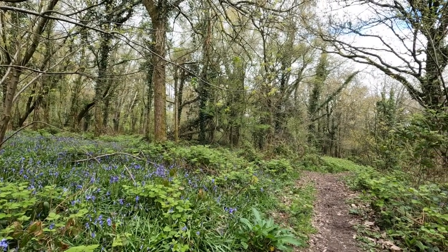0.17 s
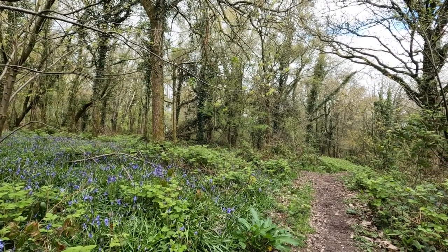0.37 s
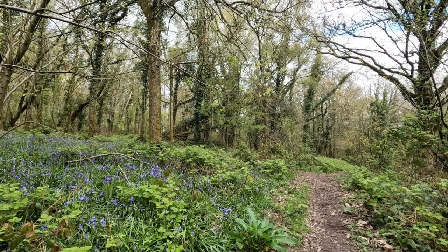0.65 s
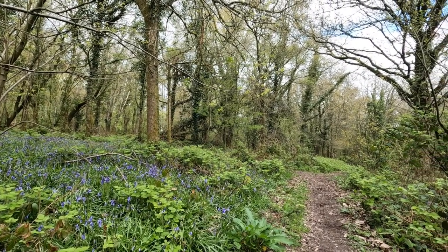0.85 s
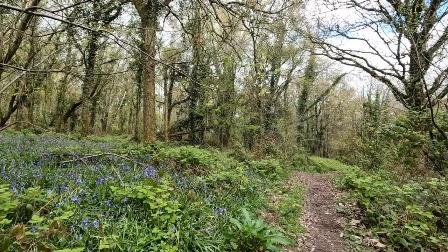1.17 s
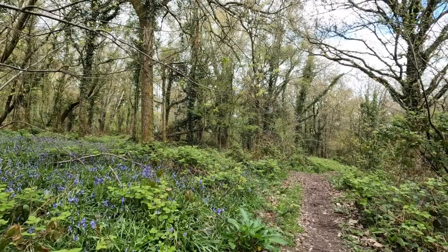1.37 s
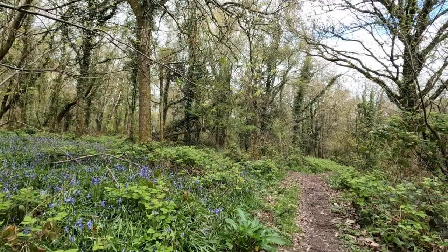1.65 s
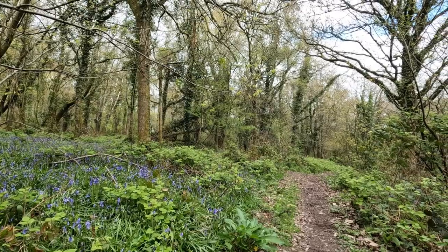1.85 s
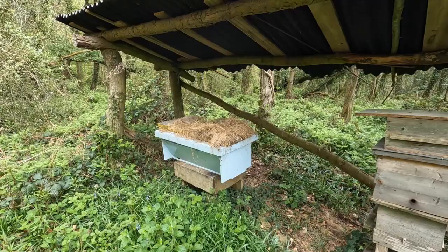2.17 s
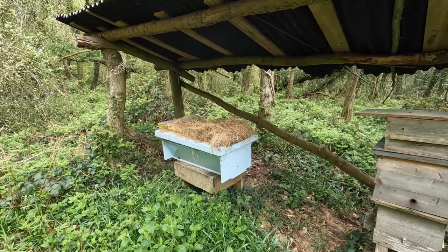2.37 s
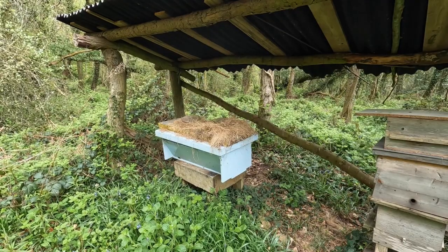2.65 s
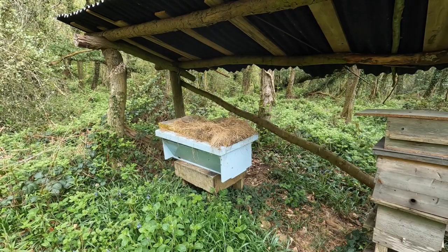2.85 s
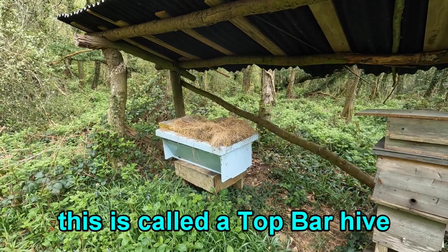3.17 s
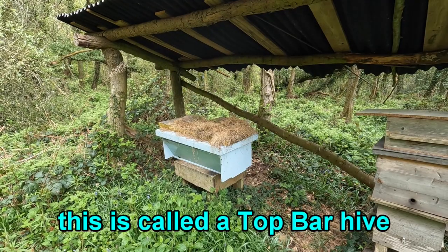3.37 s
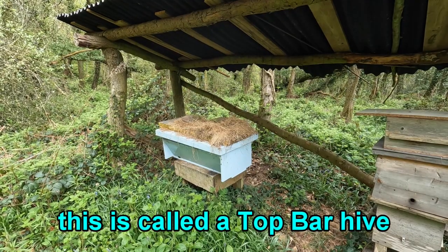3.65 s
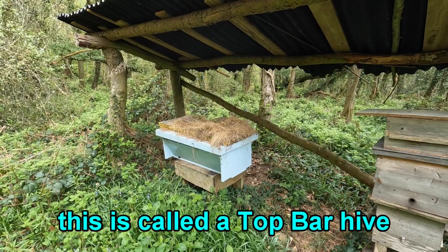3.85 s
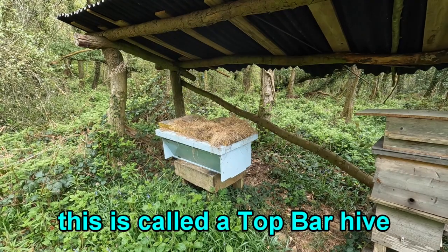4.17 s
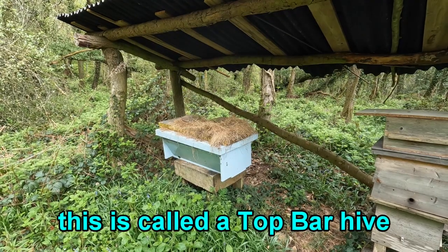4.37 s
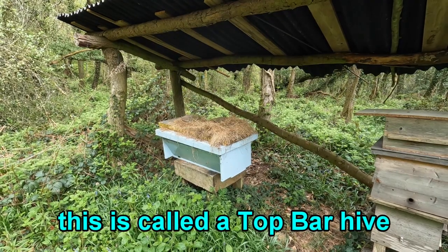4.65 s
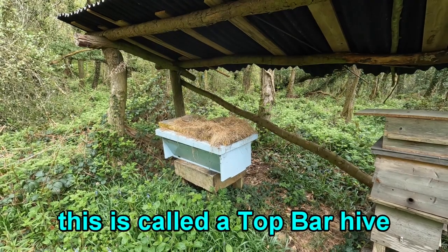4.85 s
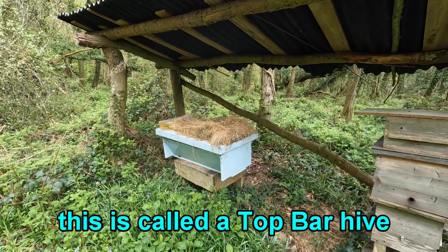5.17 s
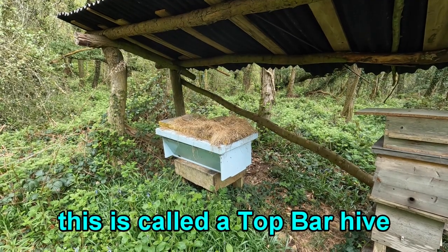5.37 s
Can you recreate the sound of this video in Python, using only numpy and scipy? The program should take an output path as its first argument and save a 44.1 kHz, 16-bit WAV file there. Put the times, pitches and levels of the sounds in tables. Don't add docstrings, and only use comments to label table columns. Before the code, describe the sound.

Lively close birdsong, sharp chirps and fast trills over unsteady low wind rumble, fills the first two seconds. It ends abruptly on a wind buffet. After a short gap, a very quiet, almost mono woodland opens beside a hive; blurred far birds grow denser, a distant engine pulses low, bees hum faintly, and murmur and hiss rise and widen towards the end.

```python
import sys
import numpy as np
from scipy import signal
from scipy.fft import rfft, irfft
from scipy.io import wavfile
from scipy.ndimage import uniform_filter1d

SR = 44100
rng = np.random.default_rng(int(sys.argv[2]) if len(sys.argv) > 2 else 0)


def master_out(mix):
    frames = np.transpose(np.atleast_2d(mix))
    ceiling = np.clip(frames, -1, 1)
    pcm = np.round(ceiling * 32767).astype(np.int16)
    wavfile.write(sys.argv[1], SR, pcm)


def field_ratio(decibels):
    return 10 ** (np.asarray(decibels, dtype=float) / 20)


N = 243431
TIME = np.arange(N) / SR

COO_WARBLE, BURR_WARBLE, RASP_WARBLE = 28, 245, 520


def curve(rows):
    rows = np.array(rows)
    return np.interp(TIME, rows[:, 0], rows[:, 1])


def walk(rate_hz):
    hold = int(SR / rate_hz)
    steps = np.repeat(rng.standard_normal(N // hold + 1), hold)
    slewed = uniform_filter1d(uniform_filter1d(steps, hold), hold)
    return 1.3 * slewed[:N]


def panned(wave, pan_db):
    sides = field_ratio(np.array([[pan_db], [-pan_db]]) / 2)
    return wave * sides / np.sqrt(np.mean(sides ** 2))


def add(track, start, wave):
    a, b = max(start, 0), min(start + wave.shape[-1], N)
    track[..., a:b] += wave[..., a - start:b - start]


def bands(spectrum, level_db, flicker_db, alike_hz):
    hz = np.maximum(np.arange(N // 2 + 1) * SR / N, 1)
    points = np.array(spectrum)
    colour = field_ratio(np.interp(np.log(hz), np.log(points[:, 0]), points[:, 1]))
    mid, side = rfft(rng.standard_normal((2, N))) * colour
    apart = 1 / np.sqrt(1 + alike_hz / hz)
    pair = np.array([mid + apart * side, mid - apart * side]) / np.sqrt(1 + apart ** 2)
    out = np.zeros((2, N))
    for octave in range(4, 15):
        distance = np.clip(np.log2(hz) - octave, -1, 1)
        share = np.cos(np.pi / 2 * distance) ** 2
        out += irfft(pair * share, N) * field_ratio(flicker_db * walk(8.2))
    return out * field_ratio(level_db) / out.std()


def whistle(s, hz, db, edge_s, waver_hz):
    i = np.arange(int((s[0] - edge_s) * SR), int((s[-1] + edge_s) * SR))
    t = i / SR
    from_end_s = np.minimum(t - t[0], t[-1] - t)
    edge = np.sin(np.pi / 2 * np.clip(from_end_s / (2 * edge_s), 0, 1)) ** 2
    pitch = uniform_filter1d(np.interp(t, s, hz), size=110) + waver_hz[i % N]
    level = np.sqrt(2) * field_ratio(np.interp(t, s, db)) * edge
    return i[0], level * np.sin(2 * np.pi * np.cumsum(pitch) / SR)


def trees(x, t60_s, rise_s, alike):
    t = np.arange(SR) / SR
    both, own = rng.standard_normal((2, 2, SR))
    noise = alike * both[0] + np.sqrt(1 - min(alike, 1) ** 2) * own
    bass = signal.sosfilt(signal.butter(2, 6500, fs=SR, output="sos"), noise)
    decay = field_ratio(-60 * t / t60_s)
    echoes = (bass + (noise - bass) * decay) * (1 - np.exp(-t / rise_s)) * decay
    echoes /= np.sqrt(np.sum(echoes ** 2, axis=1, keepdims=True))
    return signal.fftconvolve(x, echoes, axes=1)[:, :N] * field_ratio(1.5 * walk(300))


def motif_notes():
    # t after start/s, f/Hz, level under peak/dB
    seep = [(0, 7470, -23.5), (.007, 8950, -5), (.015, 8750, 1), (.026, 8000, -0.5), (.054, 8400, 2),
            (.057, 8600, -11), (.061, 9360, -10)]
    short_seep = [(0, 8970, -1.5), (.017, 8030, 1.5), (.04, 8300, -4.5)]
    swoop = [(0, 3182, -17), (.008, 3495, 1.5), (.021, 3730, -3.5), (.044, 3800, -7.5), (.064, 3890, -16.5)]
    arch = [(0, 3270, -14), (.007, 3990, -3.5), (.014, 4277, -4), (.022, 4300, -3), (.031, 4130, -4),
            (.038, 3445, -1.5), (.048, 2396, -29.5)]
    low_hook = [(0, 4094, -11), (.014, 3125, 0), (.021, 3045, -4), (.026, 3050, -8), (.035, 2975, -9)]
    high_hook = [(0, 3395, -15), (.01, 4126, -15.5), (.024, 3680, -1.5), (.04, 3316, -10)]
    late_hook = [(0, 3495, -9), (.011, 3985, -7), (.024, 3620, -2), (.038, 3360, -8)]
    dip = [(0, 2686, -7.5), (.012, 2510, -6), (.03, 2450, -2), (.055, 2470, -6.5)]
    climb = [(0, 3875, -7.5), (.012, 4230, -2.5), (.026, 4230, -3.5)]
    bow = [(0, 7100, -4.5), (.03, 7730, -1), (.05, 7740, -4.5)]
    rise = [(0, 2766, -17.5), (.012, 3147, -7), (.0205, 3436, -1), (.025, 3210, -8.5), (.03, 3020, -1)]
    pip = [(0, 3464, -6), (.0045, 3494, 0.5), (.021, 3450, -18.5)]
    drop_figure = [(0, 6520, -25), (.007, 5085, -7), (.015, 4850, -1.5), (.022, 4170, -19.5)]
    flick = [(0, 5020, -1.5), (.013, 6130, -4), (.02, 4860, -14)]
    # t/s, first f/Hz, peak level/dB, left minus right/dB
    seeps = [(.118, 7510, -60.5, 7.5), (0.474, 7480, -61.5, 9)]
    short_seeps = [(0.821, 9000, -67, 4.5), (1.116, 9040, -74.5, 1), (1.388, 9070, -69.5, 3.5),
                   (1.917, 9060, -69, 5.5)]
    swoops = [(.214, 3202, -31, 14.6)]
    arches = [(.672, 3272, -33.5, 12)]
    low_hooks = [(1.094, 4126, -39, 9.7), (1.207, 4037, -37, 14)]
    high_hooks = [(1.117, 3486, -34, 15)]
    late_hooks = [(1.234, 3456, -31.5, 17)]
    dips = [(.495, 2722, -50, -6)]
    climbs = [(.624, 3894, -46.5, -5)]
    bows = [(.23, 7000, -66, 7)]
    rises = [(1.362, 2788, -34.5, 14), (1.482, 2746, -31.5, 19)]
    pips = [(1.405, 3443, -26.5, 18), (1.52, 3470, -29, 15)]
    drops = [(1.946, 6510, -37.5, 7)]
    flicks = [(0.323, 4984, -42.5, 5.5)]
    notes = []
    for motif, rows in [(seep, seeps), (short_seep, short_seeps), (swoop, swoops), (arch, arches),
                        (low_hook, low_hooks), (high_hook, high_hooks), (late_hook, late_hooks),
                        (dip, dips), (climb, climbs), (bow, bows), (rise, rises), (pip, pips),
                        (drop_figure, drops), (flick, flicks)]:
        after, shape_hz, shape_db = np.transpose(motif)
        hidden = motif is short_seep
        for s, hz, db, pan_db in rows:
            notes.append((s + after, shape_hz * hz / shape_hz[0], db + shape_db, pan_db, hidden))
    return notes


def glide_notes():
    # t/s, length/s, first f/Hz, last f/Hz, peak level/dB
    right_glides = [(0, .011, 6420, 6380, -64), (.021, 0.012, 6300, 6000, -59),
                    (.062, .064, 5950, 5520, -59), (.149, 0.011, 5550, 5400, -59),
                    (.156, .014, 5050, 4400, -58.5), (.05, 0.012, 7200, 6950, -61.5),
                    (.25, 0.01, 5440, 5000, -63), (.19, 0.034, 4740, 4930, -63.5),
                    (.218, 0.036, 5907, 5500, -58.5), (.545, 0.049, 3220, 3475, -49),
                    (.6, 0.024, 3780, 3960, -46), (.782, 0.067, 3340, 3564, -47.5),
                    (.88, .028, 2674, 2390, -54), (1.432, 0.074, 2550, 2690, -52.5),
                    (1.432, 0.034, 6280, 6000, -64.5), (1.46, 0.068, 6000, 6880, -65),
                    (1.65, 0.053, 6320, 7200, -67.5), (1.725, 0.076, 5980, 5690, -64),
                    (1.795, 0.018, 5760, 5280, -63), (1.895, 0.042, 5770, 5460, -61),
                    (1.93, .012, 5500, 4980, -60.5)]
    left_glides = [(.126, 0.015, 3950, 3244, -42.5), (.032, 0.013, 3600, 4170, -49.5),
                   (.03, 0.011, 4700, 6000, -59), (.648, 0.026, 4750, 5220, -47),
                   (.745, 0.0066, 2350, 2780, -46), (.752, .01, 2620, 2800, -40),
                   (.76, .006, 2810, 3150, -48), (.868, .027, 7310, 7370, -64),
                   (1.069, .008, 2560, 2350, -57), (1.082, .007, 2520, 2650, -55),
                   (1.858, 0.111, 1816, 1902, -66)]
    chips = [(.045, 0.016, 6000, 3420, -46), (.057, 0.0085, 7030, 5900, -52.5),
             (1.201, 0.0093, 3084, 4120, -52), (.712, 0.013, 6300, 3910, -50),
             (.848, .004, 7200, 4500, -54), (.858, .01, 5380, 4930, -61), (1.361, .012, 6170, 4500, -58),
             (1.088, 0.011, 2600, 4040, -47.5), (1.319, .003, 7080, 4700, -57),
             (1.597, 0.011, 3400, 6500, -50.5), (1.605, 0.0065, 3410, 8000, -36),
             (1.62, .006, 7800, 3400, -37)]
    # left minus right/dB, peak place/share of length, start and end under peak/dB
    right_manner = (-4.5, 0.7, -2, -1.5)
    left_manner = (8.5, 1.2, 0, -2.5)
    chip_manner = (6.5, .5, -14, -26)
    notes = []
    for rows, manner in [(right_glides, right_manner), (left_glides, left_manner), (chips, chip_manner)]:
        pan_db, peak, start_db, end_db = manner
        share = np.array([0, np.clip(peak, .05, .95), 1])
        swell_db = np.array([start_db, 0, end_db])
        for s, length, first_hz, last_hz, db in rows:
            pitches = first_hz + share * (last_hz - first_hz)
            notes.append((s + share * length, pitches, db + swell_db, pan_db, True))
    return notes


def add_trills(track, waver_hz):
    # t/s, length/s, f/Hz, level/dB, swing rate/Hz
    trill_calls = [
        (.139, 0.0834, 3464, -35.5, 68.1),
        (1.968, 0.016, 3623, -35, 176),
        (2.028, 0.047, 2630, -42, 129.4),
    ]
    for s, length, hz, db, rate_hz in trill_calls:
        swing_hz = -0.059 * hz * np.cos(2 * np.pi * rate_hz * (TIME - s))
        times = [s, s + 0.52 * length, s + length]
        start, wave = whistle(times, [hz * 1.05, hz, hz], [db - 8, db, db], 0.002298,
                              swing_hz + 3 * waver_hz)
        add(track, start, panned(wave, 16.5))


def near_birds():
    direct, covered = np.zeros((2, 2, N))
    waver_hz = 20 * walk(200)
    for s, hz, db, pan_db, hidden in motif_notes() + glide_notes():
        start, wave = whistle(s, hz, db, .003, waver_hz)
        add(covered if hidden else direct, start, panned(wave, pan_db))
    add_trills(direct, waver_hz)
    direct *= field_ratio(1.5 * walk(200))
    spread = .8 * (direct + covered) + .2 * (direct + covered)[::-1]
    direct += field_ratio(-5 + 4.5 * walk(90)) * covered
    early = field_ratio(-12) * trees(spread, .16, 0.0012, 1.0)
    late = field_ratio(-10) * trees(spread, 0.53, 0.013, 0.86)
    return direct + early + late


def wind():
    # f/Hz, level per Hz/dB
    air_spectrum = [(20, -6.5), (42, -7), (75, -9), (118, -24), (256, -24.5), (470, -43), (850, -52.5),
                    (1150, -47), (2000, -54), (3500, -42.5), (4700, -58.5), (7000, -53.5), (9500, -66),
                    (15500, -96)]
    # t/s, rumble level/dB
    gust_levels = [(0, -61), (.09, -42), (.3, -49.5), (.38, -40.5), (.5, -53), (.6, -44), (.9, -53.5),
                   (1.28, -45), (1.7, -50), (1.92, -47), (2.05, -50.5)]
    # t/s, peak/full scale, width/s, left minus right/dB
    membrane_thumps = [
        (1.238, 0.0074, 0.0073, 7.5),
        (1.964, 0.034, 0.0076, 6),
        (1.99, -0.022, 0.0072, -13.5),
        (2.029, 0.077, 0.0059, 8.5),
        (2.047, -0.036, 0.0082, -3.5),
    ]
    air = panned(bands(air_spectrum, -46, 0.95, 1500), -0.82)
    rumble = signal.sosfilt(signal.butter(2, 110, fs=SR, output="sos"), air)
    gust = field_ratio(curve(gust_levels) + 50.0)
    air = air + (gust - 1) * rumble
    for s, peak, width_s, pan_db in membrane_thumps:
        push = peak * np.exp(-.5 * ((TIME - s) / width_s) ** 2)
        air += push * field_ratio(np.array([[pan_db], [-pan_db]]) / 2)
    return air


def distant_birds(voices):
    direct = np.zeros((1, N))
    warble_rate_hz = 130 * field_ratio(4.0 * walk(40))
    waver = field_ratio(4.3 * walk(150)) * np.sin(2 * np.pi * np.cumsum(warble_rate_hz) / SR)
    for notes, width_hz in voices:
        for s, length, first_hz, last_hz, db in notes:
            start, wave = whistle([s, s + length], [first_hz, last_hz], [db, db - 0.5], .008,
                                  (15 + width_hz) * waver)
            add(direct, start, wave)
    direct *= field_ratio(2.6 * walk(90))
    nearer = field_ratio(-4.5) * trees(direct, 0.46, 0.011, 0.55)
    deeper = field_ratio(-5.0) * trees(direct, 0.93, 0.0091, 0.99)
    return field_ratio(-1.0) * direct + nearer + deeper


def deep_birds():
    # t/s, length/s, first f/Hz, last f/Hz, level/dB
    coos = [(.15, 0.24, 1558, 1730, -77), (.25, 0.072, 1160, 1175, -73.5), (.477, .011, 1520, 1860, -64.5),
            (.49, .026, 1780, 1600, -68)]
    burrs = [(.2, .072, 2900, 2896, -60), (.556, .014, 2480, 2150, -55.5), (.572, .022, 2160, 2450, -57.5),
             (.83, 0.054, 8800, 8200, -77), (1.12, 0.056, 8850, 8100, -76.5),
             (1.395, .05, 8840, 8300, -73.5), (1.925, 0.044, 8820, 8270, -73.5),
             (.485, .04, 3510, 3060, -60), (1.425, 0.044, 4850, 4580, -64), (.965, .02, 4400, 4350, -69),
             (1.05, .025, 4650, 4700, -73), (1.48, 0.027, 4900, 5100, -63.5)]
    rasps = [(0, 0.051, 2277, 2278, -63), (.04, .05, 5460, 4630, -56.5), (1.365, .046, 5640, 4600, -59.5),
             (1.6, 0.027, 5430, 5360, -58), (.852, .03, 5600, 5000, -70), (1.47, 0.057, 6200, 6820, -68.5),
             (1.64, 0.058, 6300, 7000, -69)]
    voices = [(coos, COO_WARBLE), (burrs, BURR_WARBLE), (rasps, RASP_WARBLE)]
    return panned(distant_birds(voices), 1.2)


def camera_ticks():
    # f/Hz, level per Hz/dB
    hiss_spectrum = [(9500, -36.5), (10800, -11), (11700, -9), (12600, -11.5), (13200, -19), (14900, -25.5),
                     (15200, -41.5)]
    frame_hz = 59.94
    since = (TIME - .9364) * frame_hz % 1 / frame_hz
    pair = sum(np.exp(-.5 * ((since - lag_s - .001) / .0007) ** 2) for lag_s in (0, .0052))
    depth = 1.6 * field_ratio(2.5 * walk(5))
    return panned(bands(hiss_spectrum, -90, 3.5, 3000) * (1 + depth * pair), 3.4)


def far_birds():
    # t/s, length/s, first f/Hz, last f/Hz, level/dB
    pure = [(2, 0.11, 3180, 3080, -78.5), (2.53, 0.1, 2400, 3590, -89.5), (2.79, 0.081, 4810, 4800, -85.5),
            (3.07, .045, 3680, 3850, -70), (2.9, 0.043, 3790, 3830, -77), (3.262, 0.05, 3740, 3800, -77),
            (3.808, 0.034, 4200, 4380, -73.5), (3.905, 0.019, 3400, 2800, -61.5),
            (3.924, .028, 2840, 2770, -66.5), (3.88, .016, 2800, 3400, -66), (4.005, .035, 4900, 5200, -74),
            (4.045, 0.033, 5100, 5330, -65.5), (3.079, .038, 6080, 6090, -84),
            (5.3, 0.044, 4140, 3870, -67), (5.033, 0.047, 4830, 4680, -61),
            (4.085, 0.023, 2260, 2400, -63.5), (4.443, 0.075, 7400, 7540, -82), (4.5, .05, 7730, 7840, -87),
            (4.838, 0.044, 5900, 5400, -63), (5.479, 0.045, 3166, 3100, -62),
            (5.238, 0.031, 5080, 5030, -69.5), (5.27, 0.036, 6900, 6880, -64),
            (5.368, 0.032, 5250, 5280, -68), (5.28, .02, 7650, 7700, -72), (5.13, 0.036, 5700, 5620, -67.5),
            (2.6, .06, 3150, 3080, -81), (3.15, .04, 3350, 2950, -79.5), (3.535, .04, 3100, 3180, -84)]
    wavering = [(2.398, 0.052, 4890, 4680, -76.5), (2.815, 0.063, 3794, 4000, -73.5),
                (3.049, .04, 4770, 4820, -80.5), (3.115, .03, 4760, 4820, -89),
                (3.125, .1, 6140, 6350, -90), (3.61, 0.25, 2173, 2205, -86.5),
                (3.68, 0.23, 7490, 7150, -93), (3.9, 0.034, 6300, 5750, -75),
                (3.93, 0.078, 4880, 4150, -76.5), (3.955, .03, 2820, 3230, -74),
                (4.078, 0.029, 5330, 5250, -69), (4.61, 0.071, 2820, 2590, -72.5),
                (4.817, .02, 6200, 5600, -66), (4.882, .014, 5350, 5150, -59), (4.93, .02, 5560, 5500, -68),
                (4.98, .055, 5500, 5450, -71), (4.968, 0.025, 3950, 4130, -61.5),
                (5.04, 0.015, 4080, 3980, -63), (5.108, 0.034, 5500, 6200, -68),
                (5.5, 0.025, 2780, 2550, -63), (5.07, 0.011, 2930, 2900, -51.5),
                (5.085, .06, 2885, 2760, -58)]
    burry = [(2.319, 0.059, 2935, 2850, -83.5), (2.622, 0.13, 4430, 4120, -78.5),
             (3.149, 0.076, 3200, 3054, -78), (3.25, .065, 4040, 4770, -79), (3.64, 0.13, 4380, 4300, -79),
             (4.9, 0.034, 5180, 4900, -67), (5.055, .03, 4200, 3740, -68), (5.24, 0.035, 7360, 6870, -70),
             (2.28, 0.056, 3900, 3590, -78.5), (5.379, 0.074, 7310, 7050, -68.5),
             (5.451, 0.059, 4720, 4130, -66)]
    raspy = [(2.385, .037, 5920, 4740, -80), (2.894, .11, 3240, 3070, -81),
             (4.224, 0.054, 3520, 4470, -75.5), (4.31, 0.14, 5810, 5780, -71),
             (4.48, 0.057, 4330, 5200, -76), (4.71, .13, 4720, 4580, -69.5),
             (4.93, 0.079, 4840, 3550, -65.5)]
    return distant_birds([(pure, 35), (wavering, 134), (burry, BURR_WARBLE), (raspy, RASP_WARBLE)])


def bees():
    # t/s, length/s, first f/Hz, last f/Hz, level/dB
    bee_passes = [(2.5, .45, 506, 480, -92), (3.34, 0.17, 217, 214, -75.5), (3.301, 0.25, 420, 399, -83),
                  (3.548, .12, 238, 242, -79), (3.58, 0.25, 514, 527, -82), (4.38, .14, 554, 562, -77),
                  (4.499, 0.27, 284, 280, -75), (4.62, 0.22, 480, 495, -75), (4.7, .4, 691, 646, -81),
                  (4.85, 0.5, 561, 557, -74.5), (5.0, .3, 230, 240, -71.5), (5.2, 0.23, 204, 196, -70.5),
                  (5.15, .35, 498.5, 496, -77.5)]
    hum, wander_hz = np.zeros(N), 7.0 * walk(25)
    for s, length, first_hz, last_hz, db in bee_passes:
        start, wave = whistle([s, s + length], [first_hz, last_hz], [db, db], .03, wander_hz)
        add(hum, start, wave)
    return hum * field_ratio(3.5 * walk(14))


def drone():
    # t/s, held/s, level/dB
    engine_revs = [
        (3.42, 0.13, -67),
        (3.73, .01, -51),
        (3.9, 0.047, -53.5),
        (4.271, 0.24, -55),
    ]
    phase = 2 * np.pi * np.cumsum(87.2 * (1 + .17 * walk(45))) / SR
    effort = np.zeros(N)
    for s, held, db in engine_revs:
        rise_db = 257 * np.maximum(s - TIME, 0)
        fall_db = 166.5 * np.maximum(TIME - s - held, 0)
        effort += field_ratio(db - rise_db - fall_db)
    throb = field_ratio(4.1 * walk(24.89))
    return np.sqrt(2) * effort * throb * (np.sin(phase) + .4 * np.sin(phase / 2))


def murmur():
    # f/Hz, level per Hz/dB
    murmur_spectrum = [(35, 1.5), (92, -17), (210, -14.5), (330, -24.5), (500, -18), (570, -27.5),
                       (650, -31), (900, -35.5), (1020, -26.5), (1400, -28), (2620, -38.5), (5090, -36.5),
                       (7900, -45), (9000, -73)]
    return bands(murmur_spectrum, -51.5, 1.56, 2200)


def microphone_hiss():
    # f/Hz, level per Hz/dB
    self_noise = [(6500, -24), (8500, -3), (11000, -3.5), (12500, -2.5), (14500, -10), (15500, -22.5)]
    return bands(self_noise, -85.5, 0.82, 300)


def second_place():
    # t/s, gain/dB
    fade_in = [(2.25, -36), (2.28, -19), (2.8, -17.5), (3.3, -14.5), (3.8, -9), (4.3, -5.5), (4.8, 0),
               (5.2, 1), (5.52, 0)]
    # t/s, share of side signal/dB
    side_opening = [
        (4.3, -31),
        (4.65, -20.5),
        (4.85, -12.5),
        (5.52, -6),
    ]
    fade = field_ratio(curve(fade_in))
    left, right = far_birds() + fade * murmur()
    side = field_ratio(curve(side_opening)) * (left - right) / 2
    mid = (left + right) / 2 + drone() + bees()
    return np.array([mid + side, mid - side]) + fade ** 0.85 * microphone_hiss()


def scene():
    cut_s, back_s = 2.04627, 2.235
    first = near_birds() + wind() + deep_birds() + camera_ticks()
    return first * (TIME < cut_s) + second_place() * (TIME > back_s)


def low_pass(x):
    return signal.sosfilt(signal.butter(12, 15710, fs=SR, output="sos"), x)


def record(dry):
    return low_pass(dry)


dry = scene()
out = record(dry)
master_out(out)
```